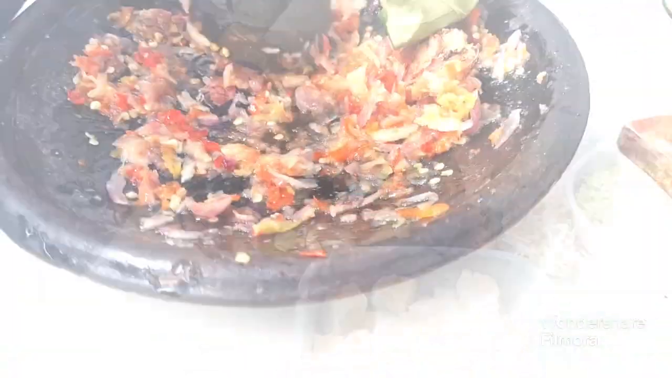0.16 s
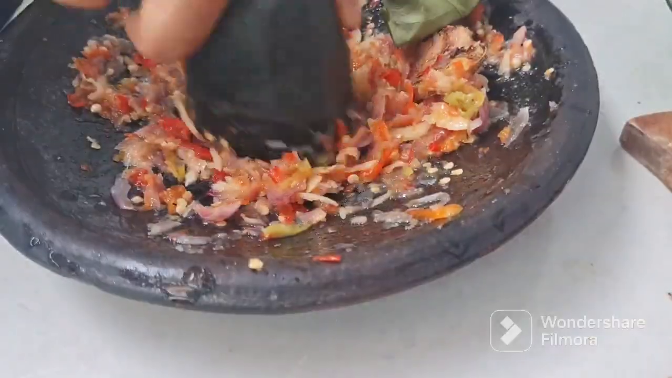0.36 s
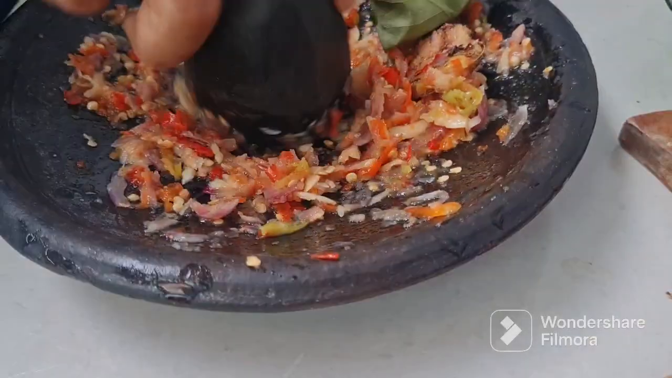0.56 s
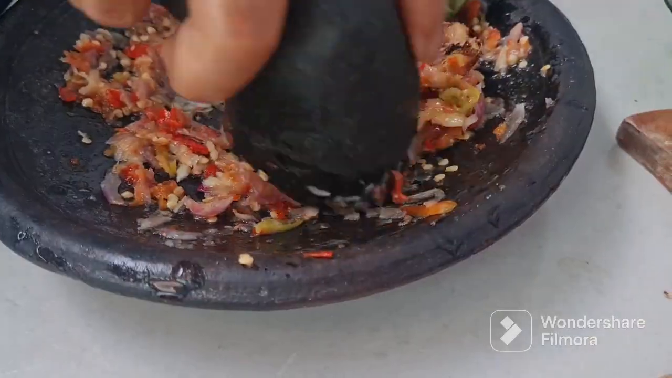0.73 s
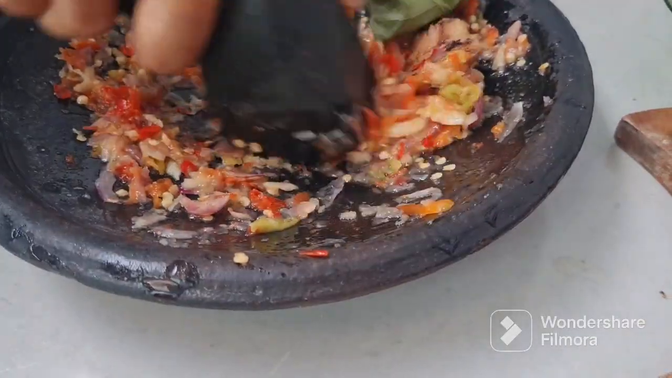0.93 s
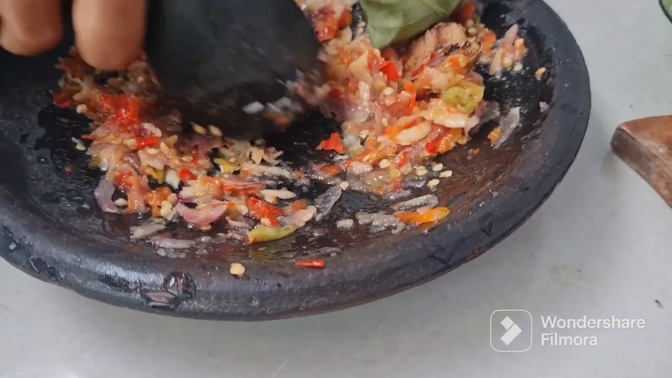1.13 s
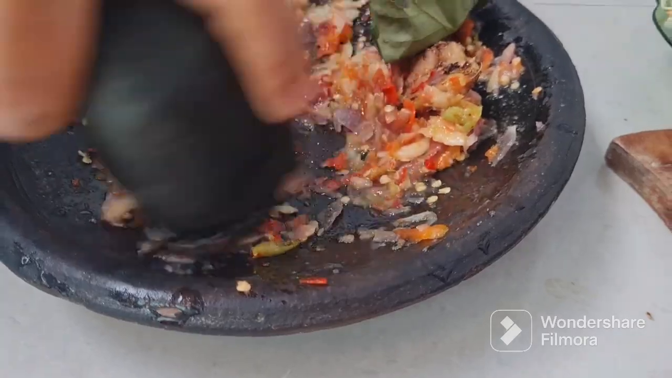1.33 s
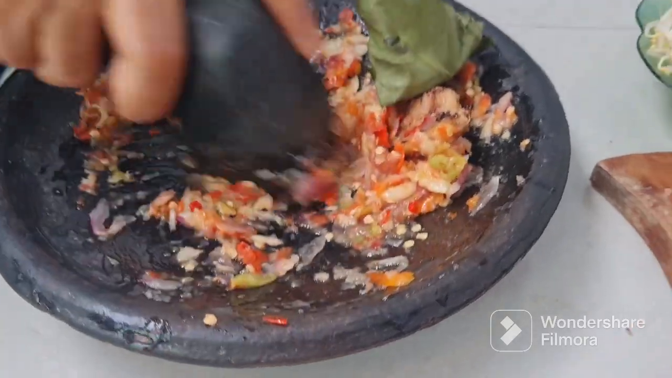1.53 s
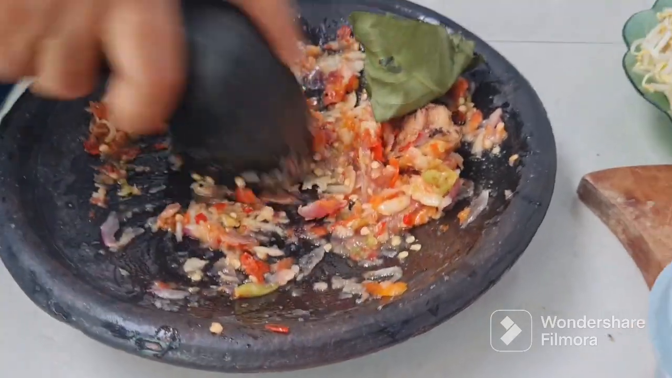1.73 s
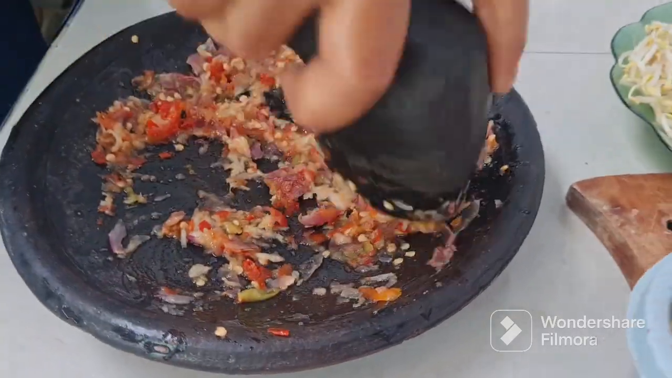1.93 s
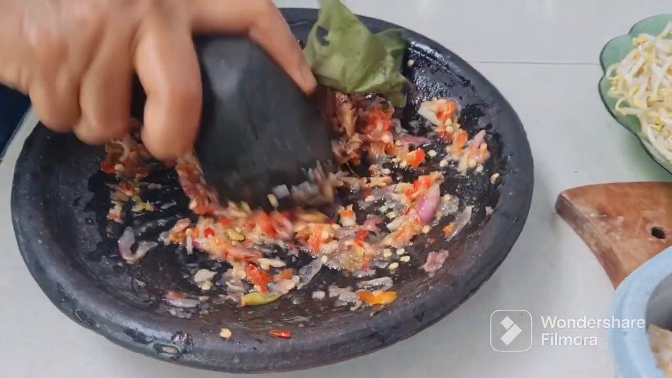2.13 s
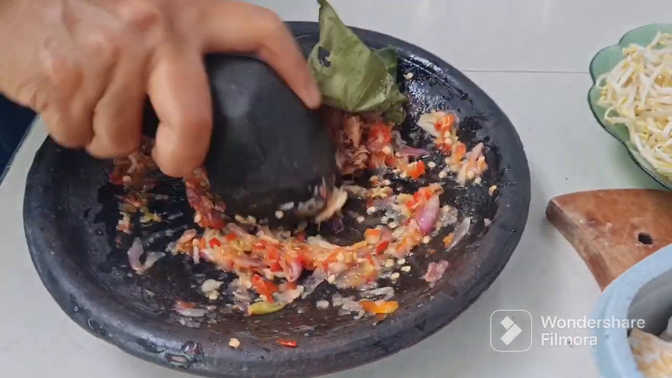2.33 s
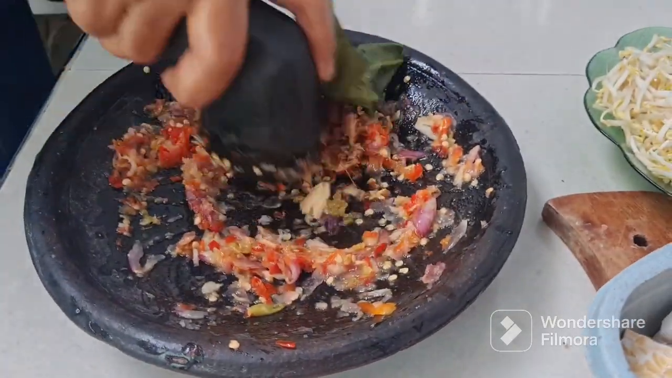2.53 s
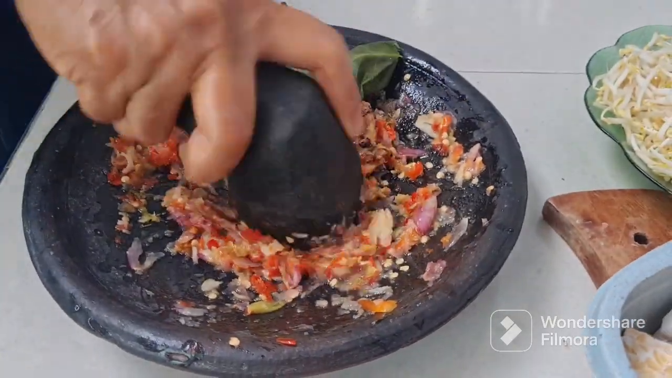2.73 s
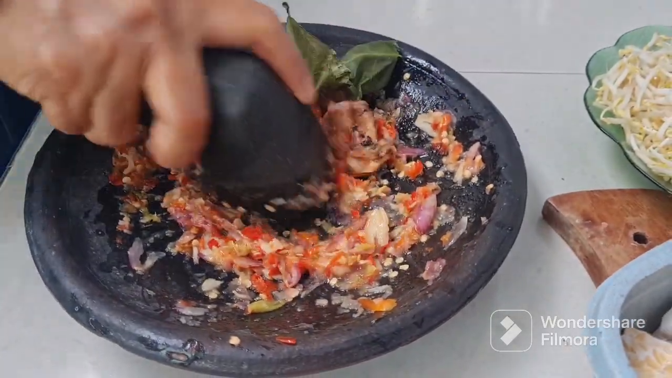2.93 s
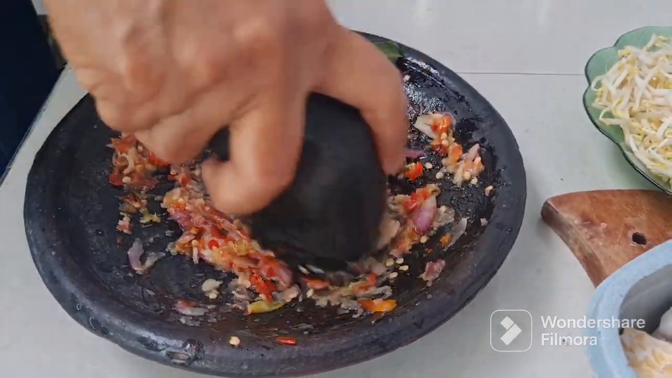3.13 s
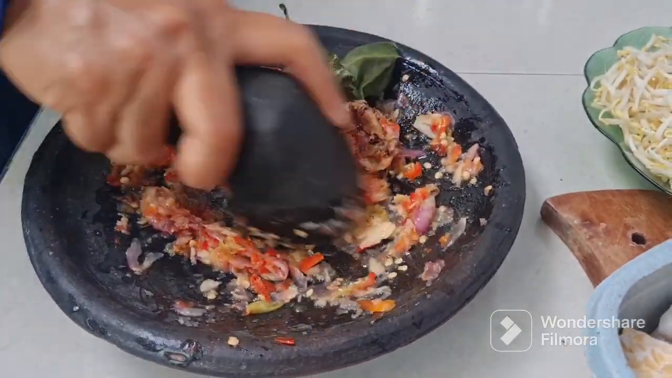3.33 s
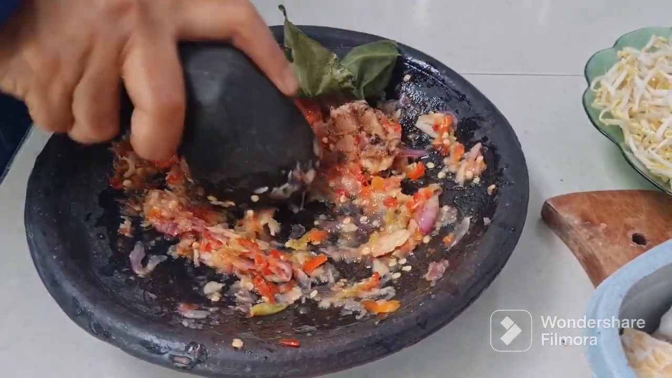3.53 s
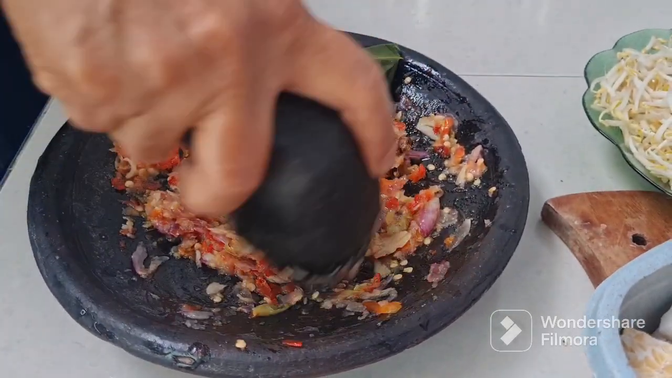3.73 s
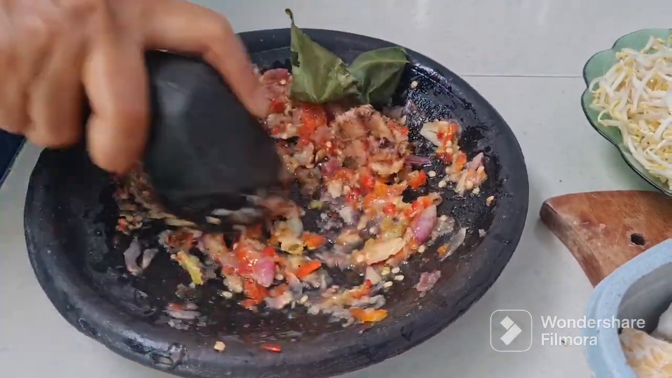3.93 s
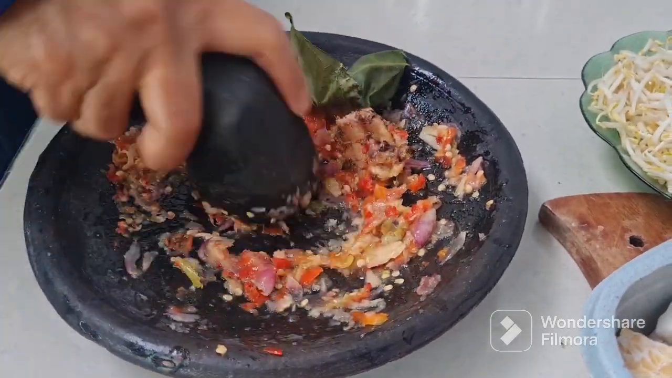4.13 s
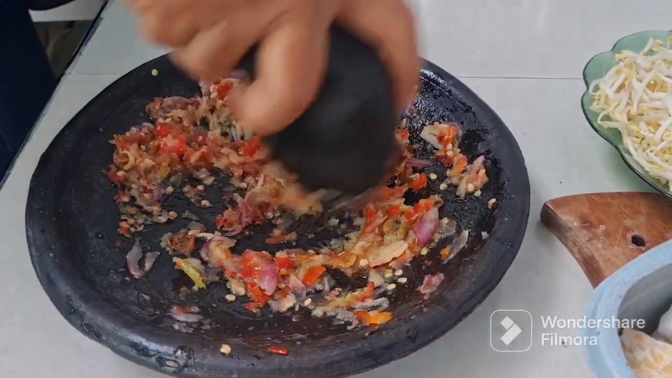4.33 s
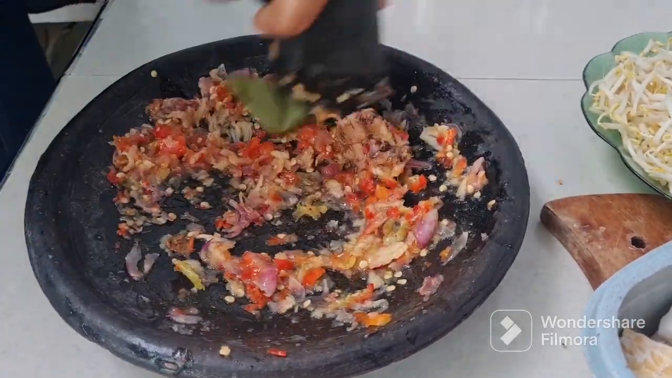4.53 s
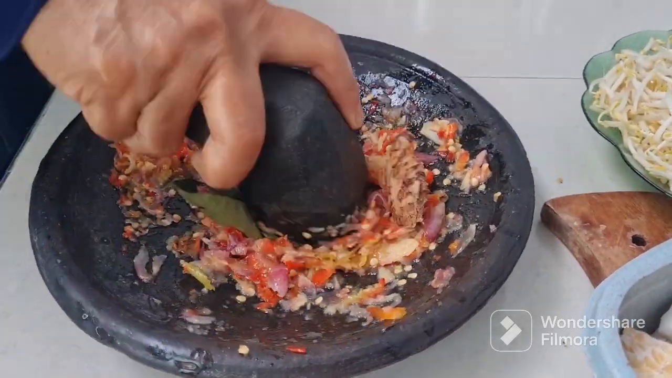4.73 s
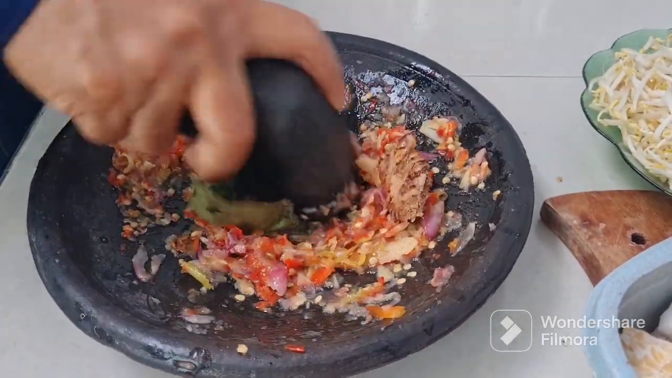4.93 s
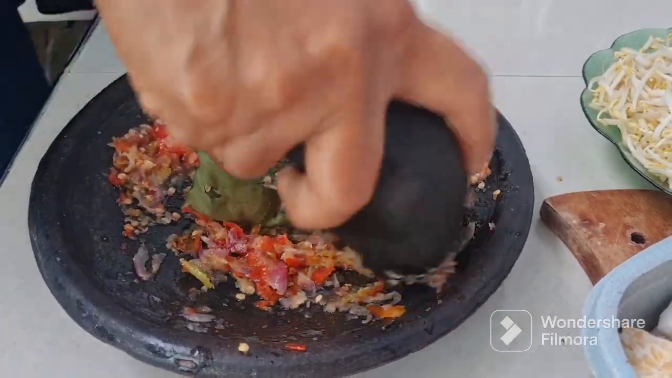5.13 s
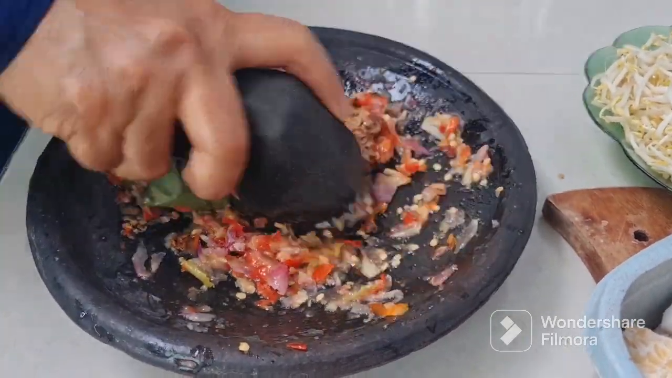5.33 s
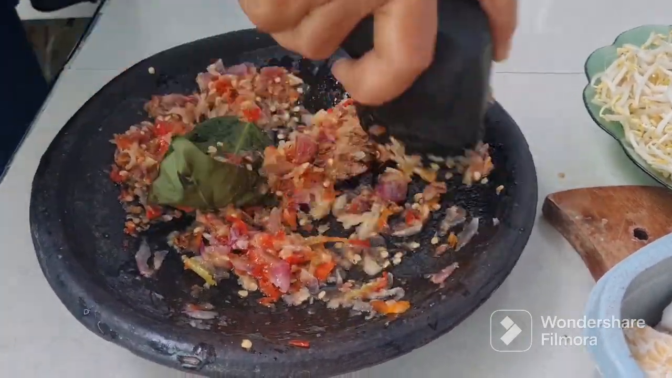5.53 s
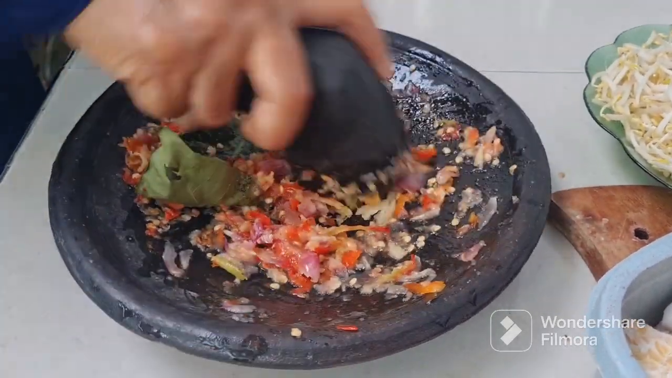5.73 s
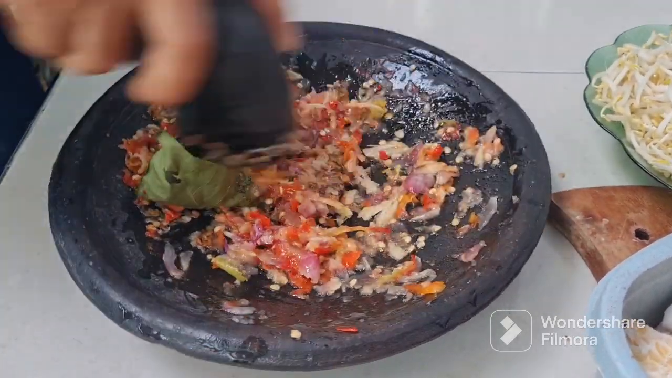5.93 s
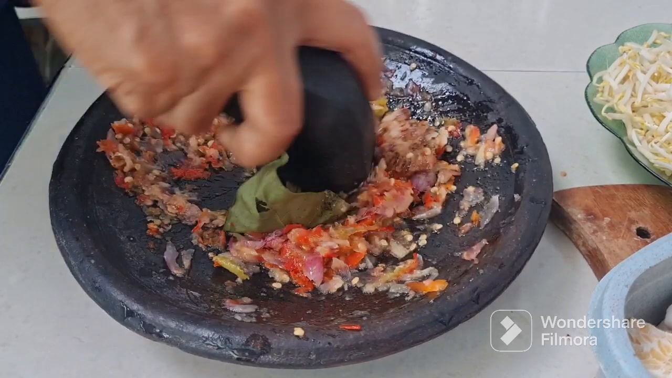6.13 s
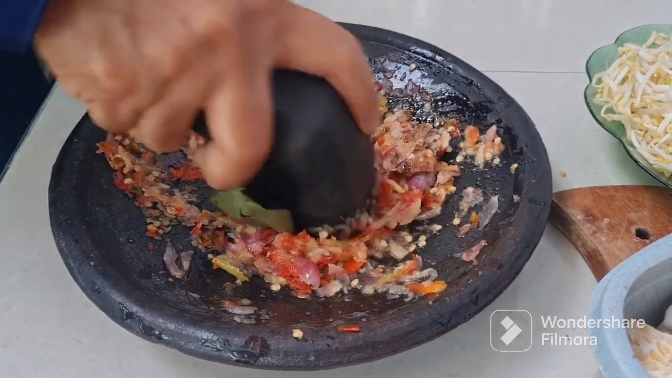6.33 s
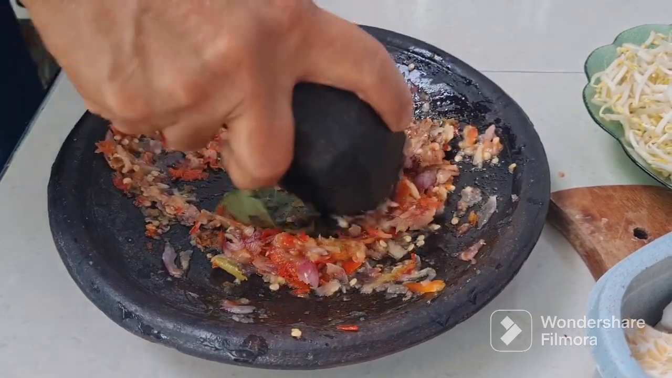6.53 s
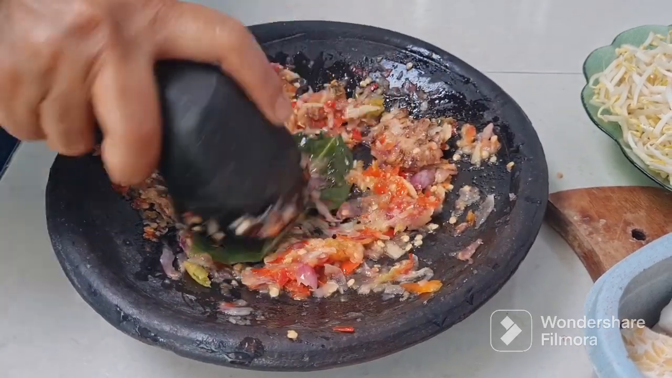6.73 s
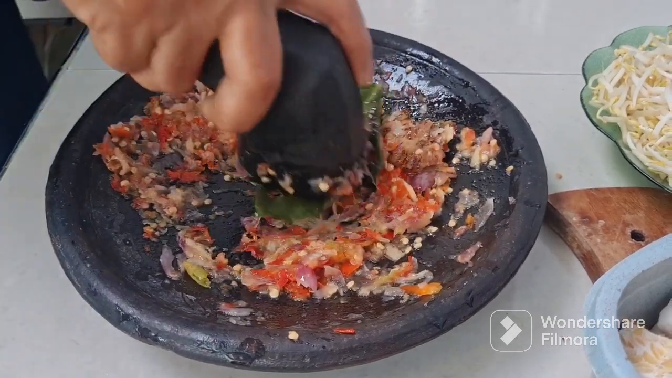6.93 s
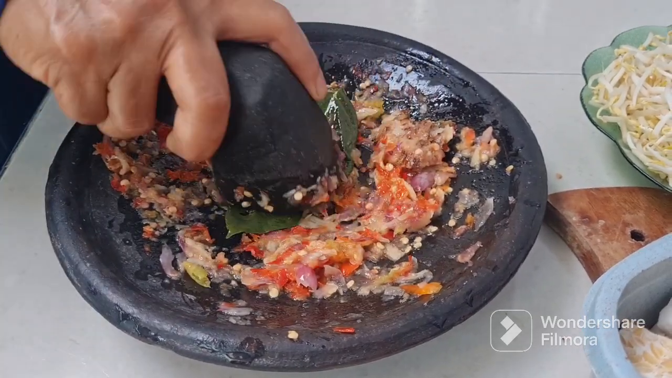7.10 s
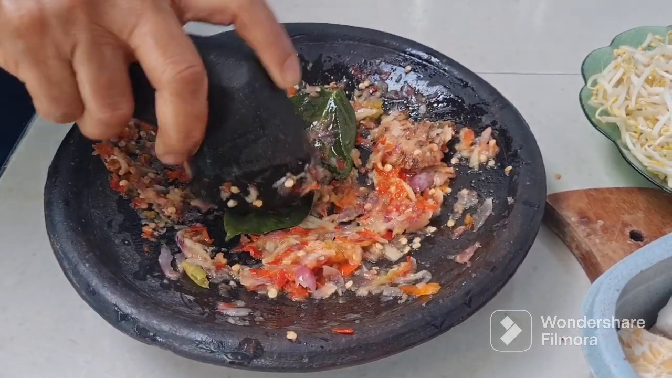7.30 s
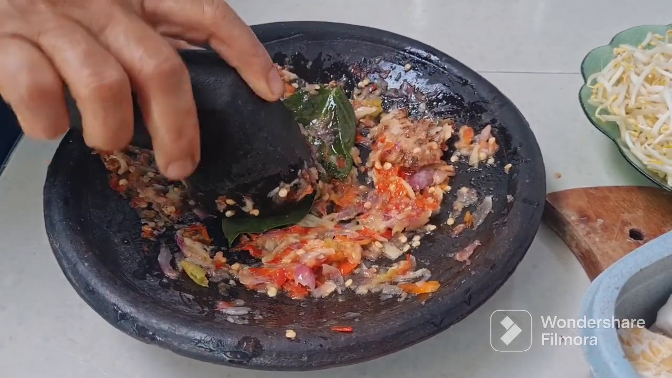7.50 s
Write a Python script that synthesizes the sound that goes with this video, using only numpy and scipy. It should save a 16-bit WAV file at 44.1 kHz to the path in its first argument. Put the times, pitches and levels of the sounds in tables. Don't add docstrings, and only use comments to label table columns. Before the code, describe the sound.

A scrap of scrape and wet crackle, a blink of silence, then a stone pestle works chilli and shallot in a flat stone mortar on a table. Dull low thuds come irregularly, several a second, with short gritty scrapes, moist squelches and crisp seed pops. Bare stone knocks stand out now and then, hardest just after five seconds. Close stereo microphone in a small reverberant kitchen, faint engine hum far outside.

```python
import sys
import numpy as np
from scipy import signal
from scipy.fft import rfft, irfft, next_fast_len
from scipy.io import wavfile

SR = 44100
rng = np.random.default_rng(int(sys.argv[2]) if len(sys.argv) > 2 else 0)


def waveform_to_disk(signal):
    frames = np.transpose(np.atleast_2d(signal))
    scaled = np.clip(frames, -1, 1) * 32767
    samples = np.round(scaled).astype(np.int16)
    wavfile.write(sys.argv[1], SR, samples)


def volts_from_decibels(level):
    exponent = np.asarray(level, float) / 20
    return 10 ** exponent


N = 333396

# f/Hz, level/dB, T60/s
TABLE_MODES = [(119, -5.5, 0.063), (168.7, -1, 0.06), (239, 4, 0.012), (242, 8, 0.051), (291.3, 0.5, 0.074),
               (317.4, -1, 0.1), (392.2, -3.5, 0.1), (423, -6, 0.18), (481, -3, 0.044), (594, -9, 0.051)]
# f/Hz, level/dB, T60/s
RIM_MODES = [(670, 1.5, 0.026), (792, -1, 0.052), (924, -6, 0.023)]
# f/Hz, level/dB, T60/s
STONE_MODES = [(1080, 10, 0.011), (1290, -38, 0.02), (1470, 6.5, 0.016), (1930, -1.5, 0.051),
               (2230, 3, 0.03), (2490, 3.5, 0.023), (2800, 7.5, 0.018), (3170, 6.5, 0.018),
               (3640, -1, 0.025), (4460, 8, 0.0049), (5000, 1, 0.014)]

# t/s, peak level/dB, rim mode level/dB, leading f/Hz
PRESSES = [(0.046, -16, -13, 474), (0.211, -11.5, -6.5, 242), (0.524, -8, -8, 300),
           (0.7883, -7.5, -10, 292), (0.93, -12.5, -11, 254), (1.174, -10, -10, 256), (1.414, -10, -2, 247),
           (1.603, -15.5, -7, 242), (2.077, -6.5, -49, 242), (2.213, -10, -20, 386), (2.392, -8, -26, 162),
           (2.447, -13.5, -4, 262), (2.747, -4, -13, 250), (2.946, -8.5, -4.5, 230),
           (3.343, -12, -5.5, 255), (3.386, -8, -8, 387), (3.6, -5, -7.5, 275), (3.662, -8.5, -5, 235),
           (4.05, -10, -10, 394), (4.246, -5.5, -3, 217), (4.615, -15.5, -2.5, 292),
           (4.719, -14.5, -3.5, 296), (5.207, -2.5, -5, 272), (5.274, 0.5, -12, 250),
           (5.641, -5.5, -6, 467), (5.7143, -7, -9, 232), (6.062, -9, -5, 436), (6.102, -8, -1, 428),
           (6.745, -9.5, -19, 230), (7.385, -14, -27, 198)]
# t/s, peak level/dB
ROCKS = [(0.315, -19), (0.571, -13.5), (1.234, -12), (1.335, -53), (1.549, -24), (1.735, -18), (1.806, -14),
         (2.548, -20), (2.827, -44), (3.003, -8), (3.182, -23.5), (3.857, -10), (3.931, -19), (4.829, -26),
         (4.932, -21), (4.982, -59), (5.336, -42), (5.492, -20.5), (5.868, -19.5), (6.49, -26),
         (6.832, -14), (6.889, -35), (7.075, -27.5), (7.158, -20.5)]
# t/s, peak level/dB, leading f/Hz
SLIPS = [(0.539, -6.5, 290.0), (0.55, -9, 180.0), (0.593, -8.5, 250.0), (0.612, -20, 312),
         (0.818, -16, 410.0), (0.861, -18, 300.0), (0.953, -12.0, 250.0), (0.964, -15, 230.0),
         (1.009, -18, 250.0), (1.183, -13.5, 260.0), (1.199, -9, 260.0), (1.213, -10.0, 270.0),
         (1.377, -25, 240.0), (1.423, -10.5, 250.0), (1.434, -13, 370.0), (1.569, -20.5, 260.0),
         (1.627, -19, 286), (1.755, -17.5, 260.0), (2.096, -26, 290.0), (2.126, -41, 210.0),
         (2.414, -17.0, 250.0), (2.429, -10.5, 233), (2.47, -11.5, 308), (2.731, -12.5, 200.0),
         (2.858, -25, 210.0), (2.971, -13, 190.0), (3.022, -14.5, 250.0), (3.035, -28, 340.0),
         (3.244, -22, 220.0), (3.351, -8.5, 260.0), (3.53, -16.5, 240.0), (3.624, -3.5, 350.0),
         (3.65, -6.5, 284), (4.015, -13.5, 406), (4.266, -6.5, 320.0), (4.297, -10.5, 418),
         (4.626, -15, 272), (4.684, -11.5, 385), (4.705, -17, 290.0), (4.745, -16, 328),
         (4.801, -21, 270.0), (4.985, -22.5, 262), (5.236, -11, 310.0), (5.31, -16, 250.0),
         (5.347, -16, 270.0), (5.376, -15.5, 268), (5.826, -14, 275), (5.947, -19, 250.0),
         (6.124, -5, 410.0), (6.139, -11, 260.0), (6.802, -13.5, 262), (7.177, -37, 300.0)]
ROCK_RIM_DB, ROCK_HZ = -12.5, 250
SLIP_DB, SLIP_RIM_DB = -3, -13
JUDDER_S = 0.01212
TABLE_CUT_HZ = 96

# t/s, peak level/dB, level of modes above 1.8 kHz/dB, bounce delay/ms, leading f/Hz
KNOCKS = [(0.209, -73, -20, 8.1, 2800), (0.2154, -31, -46, 4.1, 2000), (0.361, -51, -28.5, 7, 3250),
          (0.375, -57, -30, 6.1, 3260), (0.394, -52, -51, 6.8, 3200), (0.5268, -39, -23.5, 8.7, 2520),
          (0.7889, -1, -22.5, 14.1, 2800), (1.179, -18.5, -36, 3.3, 2360), (1.2358, -19.5, -47, 4.1, 2400),
          (1.4139, -2.5, -25.5, 5.6, 1950), (1.6033, -18.5, -58, 11, 2300), (1.804, -22, -45, 7.7, 2500),
          (2.2102, -31, -36.5, 5.4, 2200), (2.451, -18.5, -44, 3.5, 2300), (2.7466, -14.5, -28, 10, 2480),
          (2.946, -44, -22.5, 4.4, 2480), (3.015, -21, -30.5, 4.2, 3000), (3.3403, -33, -32, 5.6, 2600),
          (3.3882, -14.5, -32, 7.1, 2300), (3.5938, -45, -24.5, 4.3, 2230), (3.6668, -13, -26, 8.1, 2320),
          (4.051, -27, -32, 8.3, 2400), (4.239, -34, -24.5, 12, 2620), (4.247, -32, -28.5, 4.6, 2800),
          (4.6137, -18, -11.5, 10, 2300), (4.7231, -33, -24.5, 9.3, 2300), (5.2083, -3.5, -18.5, 7.4, 3050),
          (5.2195, -8, -36, 2.8, 1980), (5.2754, -15, -21, 11.6, 2050), (5.644, -23, -19, 2.35, 2800),
          (5.7152, -7, -13, 4.5, 3080), (6.0636, -35, -23, 4, 2370), (6.1043, -34, -15, 1.7, 2500)]
LEAD_DB_PER_OCTAVE = 15
BOUNCE_DB, BOUNCE_LOW_DB = 5, -5
HARD_DB, BOUNCE_LOSS = 16, 0.2
CHATTER_MS, CHATTER_DB = 2.2, -2.5
CONTACT_HZ = 6170
HAND_DAMPING = 0.75
FAR_DAMPING, FAR_DB = 0.34, 10

# t/s, length/s, stone scrape level/dB, pulp crackle level/dB
STROKES = [(0.0, 0.011, -30, -37.5), (0.277, 0.11, -37, -43.5), (0.48, 0.1, -32, -43),
           (0.829, 0.087, -23, -51), (0.933, 0.14, -34, -56), (1.15, 0.12, -36, -51),
           (1.075, 0.021, -45, -48.5), (1.528, 0.052, -31.5, -45), (1.627, 0.2, -41.5, -53.5),
           (2.077, 0.2, -39, -44.5), (2.2, 0.21, -49, -47), (2.387, 0.086, -38, -43),
           (2.63, 0.055, -41, -49), (2.695, 0.32, -34, -42.5), (2.918, 0.21, -58, -54.5),
           (3.185, 0.095, -40, -49), (3.344, 0.056, -31, -41.5), (3.511, 0.17, -37, -39.5),
           (3.861, 0.21, -33, -43.5), (4.143, 0.0091, -31.5, -39.5), (4.23, 0.08, -31, -44.5),
           (4.32, 0.079, -50, -66), (4.606, 0.14, -25, -50), (4.775, 0.19, -33, -51.5),
           (5.242, 0.16, -63, -46.5), (5.322, 0.14, -34.5, -50), (5.66, 0.085, -48, -52),
           (5.666, 0.18, -25, -59), (6.054, 0.15, -30, -53), (6.353, 0.056, -35.5, -51),
           (6.45, 0.086, -46, -49.5), (6.699, 0.17, -32, -44), (7.075, 0.12, -41.5, -53),
           (7.37, 0.17, -39.5, -63)]
BITE_DB_PER_S, LIFT_DB_PER_S, IDLE_DB = 464, 171, -68.5
RUMBLE_DB, RUMBLE_SWELL_S, RUMBLE_REST_DB = -30, 0.033, -49

# t/s, peak level/dB, f/Hz, length/ms
CRACKS = [(0.3164, -17.5, 7900, 4.4), (0.3586, -8.5, 4020, 2.5), (0.509, -11, 5200, 1.67),
          (0.9762, -13, 5600, 2.25), (1.1618, -15.5, 5600, 4.2), (1.222, -14.5, 10000, 3),
          (1.7811, -11, 5900, 1.56), (2.2185, -22, 10500, 1.2), (2.2325, -3.5, 9900, 1.1),
          (2.38, -18, 11200, 0.81), (2.39, -8.5, 7900, 1.43), (2.4698, -10.5, 5000, 2.2),
          (2.7564, -6.5, 5540, 1.46), (2.9239, 0.5, 6430, 1.88), (2.99, -4.5, 5400, 2.65),
          (3.3116, -22.5, 11300, 5.1), (3.3764, -12.5, 4960, 3.2), (3.5569, -13, 9900, 1.6),
          (3.5815, -2.5, 5450, 2.46), (3.727, -22, 10900, 1.9), (3.9465, -13.5, 7390, 2.05),
          (3.9926, -0.5, 5660, 0.8), (4.0717, -5.5, 4620, 1.1), (4.177, -21, 7500, 3.3),
          (4.964, -15.5, 5450, 3.84), (5.3534, -12.5, 5150, 2.2), (5.4166, -15.5, 4770, 3.1),
          (4.6075, -19, 3000, 2), (5.6375, -18.5, 13000, 2.6), (5.689, -31, 12200, 2),
          (5.703, -36, 12000, 1.7), (6.0524, -11, 4200, 2.85), (6.8256, -1, 10100, 1.17),
          (7.0699, -4, 4860, 5.1), (7.3834, -13.5, 5000, 2.33)]
# t/s, peak level/dB
SNAPS = [(0.0588, -22), (0.177, -26), (0.622, -14.5), (0.9625, -20), (1.2473, -15), (1.6573, -18),
         (1.7155, -24), (2.07, -22), (2.5716, -23), (2.6574, -17.5), (3.2753, -17), (3.4203, -11.5),
         (3.5224, -18), (3.86, -20), (3.929, -21), (4.136, -32), (4.2204, -19), (4.3014, -16.5),
         (4.5705, -36), (4.5968, -22), (4.83, -26), (6.039, -33), (6.4932, -27), (6.51, -21), (6.7067, -20),
         (6.814, -14), (6.889, -19)]
# t/s, peak level/dB, f/Hz
TICKS = [(0.5154, -8, 5910), (0.8589, -26, 4820), (0.8714, -33, 6230), (0.946, -21, 5300),
         (0.9954, -16, 5500), (1.0104, -24, 6510), (1.074, -32, 5530), (1.1348, -28, 5700),
         (1.1702, -14, 5400), (1.254, -18, 5360), (1.2734, -18, 5750), (1.545, -25, 4690),
         (1.6352, -20, 5630), (1.7454, -19, 5320), (1.793, -14, 5450), (1.8114, -17, 5560),
         (1.8294, -35, 5300), (2.0517, -38, 5020), (2.2035, -26, 9810), (2.2444, -1.5, 5340),
         (2.4457, -13, 5590), (2.6284, -22, 4440), (2.647, -22, 5400), (2.6838, -43, 6400),
         (3.0365, -15, 5400), (3.1727, -27, 7310), (3.218, -20, 10700), (3.3554, -29, 5020),
         (3.5722, -14, 9810), (3.5895, -6, 5070), (3.9547, -13, 7370), (4.0104, -23, 5670),
         (4.152, -25, 5270), (4.2342, -26, 4690), (4.266, -30, 6490), (4.2832, -19, 4820),
         (4.5805, -18, 4500), (5.361, -12, 5170), (6.1723, -20, 5100), (6.3709, -21, 7340),
         (6.4024, -21.5, 10900), (6.4323, -38, 5230), (6.4557, -39, 5570), (6.6874, -28, 5370),
         (6.7226, -13, 5110), (6.7436, -21, 11900), (6.801, -37, 5150), (7.0804, -20, 5440)]
SNAP_HZ, SNAP_MS = 5200, 2.0
TICK_MS, TICK_DB = 0.53, -1
SPIT_DB = -10
SPLIT = 11

# f/Hz, level per Hz/dB
PULP = [(900, -35), (1700, -13), (2300, 2), (3900, -0.5), (5700, 0.5), (7600, -8.5), (11500, -1.5),
        (16000, -12.5)]
HISS_FLICKER_DB, CLUMP_DB, PRICK_SHARE = 3.5, 3, 0.8
BOWL_SHARE = 0.22
ECHO_SET_S = 0.015

# f/Hz, T60/s
KITCHEN_T60 = [(150, 1), (500, 0.16), (1500, 0.59), (4000, 0.4), (10000, 0.35)]
# f/Hz, level/dB
WET = [(150, -9), (500, -3.5), (1500, 2.5), (4000, 1), (10000, 4)]
ROOM_BUILD_S, ROOM_PATTERN_S = 0.012, 0.11
KNOCK_WET_DB, PULP_WET_DB = -7, -11
WALL_ECHO_S, WALL_ECHO_DB = 0.022, -15

# t/s, firing order level/dB
ENGINE = [(0.0, -39.5), (0.63, -30), (0.76, -55), (2.15, -30), (2.36, -30), (2.92, -29.5), (3.2, -33),
          (3.58, -30.5), (4.9, -39), (5.39, -46), (5.62, -47), (7.31, -53), (7.56, -33)]
ENGINE_HZ, FLUTTER_DB = 42.95, 5
ENGINE_MEAN_DB, FOURTH_DB, FOURTH_SWING = -34, -42.5, 2.8
# start t/s, end t/s, start f/Hz, end f/Hz, width/Hz, level/dB
YARD = [(5.08, 5.2, 3830, 4000, 64, -55), (5.121, 5.194, 3180, 2820, 65, -48),
        (6.618, 7.208, 1537, 1534, 318, -51), (7.366, 7.559, 1450, 1430, 198, -51.5),
        (6.616, 7.117, 758, 750, 39.76, -50), (6.755, 7.15, 1004, 940, 60.6, -53.5),
        (7.198, 7.56, 970, 1046, 50.3, -58), (6.304, 6.613, 709, 713, 39.9, -52),
        (7.15, 7.559, 725, 746, 201.3, -57), (7.41, 7.56, 627, 630, 33.9, -46.5),
        (7.448, 7.552, 3080, 2800, 170, -39)]
# f/Hz, level per Hz/dB
AIR = [(18, -43), (42, 15), (103, 1), (245, 2.5), (345, -42), (423, -29), (544, -14), (766, -5.5),
       (1260, -54), (2880, -9.5), (5090, -15.5), (7000, -56), (9100, -61), (15400, -120)]
AIR_DB = -33

# f/Hz, level/dB
PORTS = [(60, -3), (400, -3), (800, -2), (1500, -.5), (2800, -3.5), (5500, -5), (10000, -3.5), (15000, -4)]
PORT_LAG = 6
GAP_S = (0.013, 0.0455)
CUTOFF_HZ = 16350


def pushes():
    rocks = [(s, db, ROCK_RIM_DB, ROCK_HZ) for s, db in ROCKS]
    slips = [(s, db + SLIP_DB, SLIP_RIM_DB, hz) for s, db, hz in SLIPS]
    return np.transpose(PRESSES + rocks + slips)


def thuds(count=3):
    s, peak_db, rim_db, lead_hz = pushes()
    late = rng.random((len(s), count)) * (np.arange(count) > 0)
    times = (s[:, None] + late * JUDDER_S).ravel()
    push_db = (peak_db[:, None] - 8.0 - 3 * (late > 0) - 8 * late).ravel()
    octaves = np.log2(np.array(TABLE_MODES)[:, 0] / np.repeat(lead_hz, count)[:, None])
    table_db = push_db[:, None] - 8.5 * np.abs(octaves)
    low = strike(TABLE_MODES, times, table_db, spread_db=np.e)
    rim_push_db = push_db + np.repeat(rim_db, count) + 2.5
    rim_level_db = np.outer(rim_push_db, np.ones(len(RIM_MODES)))
    return low + strike(RIM_MODES, times, rim_level_db, spread_db=np.e)


def knocks(count=4):
    s, peak_db, high_db, bounce_ms, lead_hz = np.transpose(KNOCKS)
    mode_hz = np.array(STONE_MODES)[:, 0]
    high = mode_hz > 1800
    off_db = LEAD_DB_PER_OCTAVE * np.abs(np.log2(mode_hz / lead_hz[:, None]))
    first_db = np.where(high, high_db[:, None] - off_db - 4.5, peak_db[:, None] - 13.5)

    back_db = BOUNCE_DB + BOUNCE_LOSS * (high_db[:, None] - HARD_DB) + BOUNCE_LOW_DB * ~high
    times = np.concatenate([s, s + bounce_ms / 1000])
    level_db = np.concatenate([first_db, first_db + back_db])

    late = (np.arange(count) + rng.random((len(times), count))) / count * CHATTER_MS / 1000
    chatter_db = np.where(high, level_db, -120)[:, None] + CHATTER_DB * np.arange(count)[:, None]
    all_times = np.append(times, times[:, None] + late)
    all_db = np.concatenate([level_db, chatter_db.reshape(-1, len(STONE_MODES))])

    held = [(hz, db + 2.5, t60 * HAND_DAMPING) for hz, db, t60 in STONE_MODES]
    near = strike(held, all_times, all_db, spread_db=2, swing=1)
    blurred = [(hz, db + FAR_DB, t60 * FAR_DAMPING) for hz, db, t60 in STONE_MODES]
    far = strike(blurred, s, first_db, spread_db=2.5, swing=1)
    dull = signal.butter(2, CONTACT_HZ, fs=SR, output="sos")
    return signal.sosfilt(dull, [near, far])


def stroking():
    t = np.arange(0, N + 64, 64) / SR
    start, length, *levels = np.transpose(STROKES)[:, :, None]
    before_db = BITE_DB_PER_S * np.maximum(start - t, 0)
    after_db = LIFT_DB_PER_S * np.maximum(t - start - length, 0)
    curves = [np.maximum((db - before_db - after_db).max(axis=0), IDLE_DB) for db in levels]
    return [np.interp(np.arange(N) / SR, t, curve) for curve in curves]


def shaking():
    s, peak_db = pushes()[:2]
    kicks, r = np.zeros(N), np.exp(-1 / (RUMBLE_SWELL_S * SR))
    kicks[(s * SR).astype(int)] = volts_from_decibels(peak_db + RUMBLE_DB)
    swell = signal.lfilter([1], [1, -2 * r, r * r], kicks)
    return volts_from_decibels(RUMBLE_REST_DB) + np.e * (1 - r) * swell


def grinding():
    base = rubbed(TABLE_MODES, 200, 2.5, damping=0.8)
    base = base + volts_from_decibels(-14) * rubbed(RIM_MODES, 200, 2.5, damping=0.8)
    grit = rubbed(STONE_MODES, 900, 4.0, damping=0.4)
    rumble = shaking() * volts_from_decibels(2 * drift(30)) * base
    scrape_db = stroking()[0] - 12.5 + 2 * drift(42)
    return rumble + volts_from_decibels(scrape_db) * grit


def cracks():
    length = 2000
    out, span = np.zeros(N + length), np.arange(length) / SR
    small = SNAPS + [(s, high_db + SPIT_DB) for s, _, high_db, *_ in KNOCKS]
    bursts = CRACKS + [(s, db, SNAP_HZ, SNAP_MS) for s, db in small]
    bursts = bursts + [(s, db + TICK_DB, hz, TICK_MS) for s, db, hz in TICKS]
    fibre = signal.butter(1, [2400, 9000], "band", fs=SR, output="sos")
    tears = rng.standard_normal((len(bursts), length))
    for (s, peak_db, hz, length_ms), tear in zip(bursts, tears):
        u = span / (max(length_ms, 0.3) / 1000)
        at_split = np.arange(length) == np.argmin(np.abs(u - 1.5))
        split = SPLIT / max(length_ms, 1) * at_split
        tear = signal.sosfilt(fibre, tear * np.abs(tear) + 2 * split)
        pitched = signal.lfilter(*signal.iirpeak(hz, 1.8, fs=SR), tear)
        envelope = np.exp(-2 * (u - 1.5) ** 2) + 0.48 * np.exp(-u / 5) * (u > 1.5)
        burst = (rms_one(pitched) + 1.5 * rms_one(tear)) * envelope
        at = round((s - 0.001 * length_ms) * SR)
        out[at:at + length] += volts_from_decibels(peak_db) * burst / np.abs(burst).max()
    return out[:N]


def squelch(count=14):
    pops = grains(700 * volts_from_decibels(4.0 * drift(70)), uneven_db=3.0)
    dealt = rng.integers(0, count, N)
    rings = np.zeros(N)
    for k, hz in enumerate(np.geomspace(2200, 14500, count)):
        rings += ring(pops * (dealt == k), hz, 1.5 / hz) * np.sqrt(hz)
    hiss = rng.standard_normal(N) * volts_from_decibels(HISS_FLICKER_DB * drift(220))
    pricks = grains(350 * volts_from_decibels(5.0 * drift(40)), uneven_db=3.5)
    pricks = signal.sosfilt(signal.butter(1, 8000, fs=SR, output="sos"), pricks)
    wet = 0.6 * rms_one(rings) + PRICK_SHARE * rms_one(pricks) + hiss
    crackle_db = stroking()[1] + 7.5 + CLUMP_DB * drift(30)
    return volts_from_decibels(crackle_db) * coloured(wet, PULP)


def off_the_dish(x, count=7):
    t = np.arange(160) / SR
    bounce = BOWL_SHARE * rng.standard_normal((count, 2, len(t))) * volts_from_decibels(-60 * t / 0.008)
    bounce[:, :, 0] = 1
    bounce = bounce / np.linalg.norm(bounce, axis=2, keepdims=True)
    slot = (np.arange(N) / SR / ECHO_SET_S).astype(int) % 400
    place = rng.integers(0, count, 400)[slot]
    out = np.zeros((2, N))
    for k in range(count):
        out += signal.oaconvolve((x * (place == k))[None], bounce[k], axes=1)[:, :N]
    return out


def kitchen(x, count=3):
    t, tail = np.arange(int(0.8 * SR)) / SR, 0
    for hz in 125 * 2.0 ** np.arange(7):
        band = signal.butter(2, [hz / 2 ** 0.5, hz * 2 ** 0.5], "band", fs=SR, output="sos")
        fall = volts_from_decibels(-60 * t / at_hz(KITCHEN_T60, hz)) * np.clip(t / ROOM_BUILD_S, 0, 1)
        white = rng.standard_normal((count, 3, len(t))) * fall / np.sqrt(np.sum(fall ** 2))
        alike = np.clip(300 / hz, 0, 0.97)
        pair = alike * white[:, :1] + np.sqrt(1 - alike ** 2) * white[:, 1:]
        tail = tail + volts_from_decibels(at_hz(WET, hz)) * signal.sosfilt(band, pair)
    turn, size = np.arange(N) / SR / ROOM_PATTERN_S, next_fast_len(N + len(t))
    shares = np.sqrt([np.clip(1 - np.abs((turn - k) % count - 1), 0, 1) for k in range(count)])
    spectra = rfft(x * shares, size)[:, None] * rfft(tail, size)
    return irfft(spectra.sum(axis=0), size)[:, :N]


def engine():
    first_db, = in_time(ENGINE)
    fourth_db = FOURTH_DB + FOURTH_SWING * (first_db - ENGINE_MEAN_DB)
    phase = 2 * np.pi * np.cumsum(ENGINE_HZ * (1 + 0.0076 * drift(13))) / SR
    wave = np.sin(phase) + volts_from_decibels(-5.5) * np.sin(2 * phase)
    first = volts_from_decibels(first_db - 10.0 + FLUTTER_DB * drift(10)) * wave
    return first + volts_from_decibels(fourth_db + 3.0 * drift(14)) * np.sin(4 * phase)


def yard():
    out, t = np.zeros(N), np.arange(N) / SR
    for start, end, from_hz, to_hz, width_hz, level_db in YARD:
        phase = 2 * np.pi * np.cumsum(np.interp(t, [start, end], [from_hz, to_hz])) / SR
        fade = np.clip(np.minimum(t - start, end + 0.0076 - t) / 0.023, 0, 1)
        noise = drift(width_hz) * np.sin(phase) + drift(width_hz) * np.cos(phase)
        out += volts_from_decibels(level_db) * fade * noise
    return out


def room_tone():
    shared, own = rng.standard_normal(N), rng.standard_normal((2, N))
    return volts_from_decibels(AIR_DB - 16.0) * coloured(1.8 * shared + own, AIR)


def strike(modes, times, level_db, spread_db, swing=-1):
    at = np.clip(np.round(np.asarray(times) * SR).astype(int), 0, N - 1)
    out = np.zeros(N)
    chance = rng.standard_normal((len(at), len(modes)))
    for k, (hz, mode_db, t60) in enumerate(modes):
        clicks = np.zeros(N)
        np.add.at(clicks, at, volts_from_decibels(level_db[:, k] + mode_db + spread_db * chance[:, k]))
        out -= ring(clicks, hz, t60) * swing ** k
    return out


def rubbed(modes, per_s, uneven_db, damping):
    rings = [volts_from_decibels(db) * ring(grains(per_s, uneven_db), hz, t60 * damping) for hz, db, t60 in modes]
    return rms_one(sum(rings))


def ring(clicks, hz, t60):
    r, w = volts_from_decibels(-60 / (t60 * SR)), 2 * np.pi * hz / SR
    return signal.lfilter([0, np.sin(w)], [1, -2 * r * np.cos(w), r * r], clicks + 1e-18)


def grains(per_s, uneven_db):
    sizes = volts_from_decibels(uneven_db * np.minimum(rng.exponential(1, N), 5)) * rng.choice([-1, 1], N)
    return sizes * (rng.random(N) < per_s / SR)


def drift(rate):
    slow = rng.standard_normal(int(N / SR * rate) + 2)
    return np.interp(np.linspace(0, len(slow) - 1, N), np.arange(len(slow)), slow)


def coloured(x, spectrum):
    hz = np.maximum(np.fft.rfftfreq(N, 1 / SR), 1)
    return rms_one(irfft(rfft(x) * volts_from_decibels(at_hz(spectrum, hz)), N))


def rms_one(x):
    return x / np.sqrt(np.mean(x ** 2) + 1e-20)


def in_time(rows):
    s, *columns = np.transpose(rows)
    return [np.interp(np.arange(N) / SR, s, c) for c in columns]


def at_hz(points, hz):
    table_hz, value = np.array(points).T
    return np.interp(np.log(hz), np.log(table_hz), value)


def scene():
    thud = thuds() + grinding()
    knock, far_knock = knocks()
    pulp = cracks() + squelch()
    stone = thud + knock
    stone = stone + volts_from_decibels(WALL_ECHO_DB) * np.roll(stone, round(WALL_ECHO_S * SR))
    low_cut = signal.butter(2, TABLE_CUT_HZ, "high", fs=SR, output="sos")
    near = signal.sosfilt(low_cut, stone) + engine() + yard() + off_the_dish(pulp)
    near[1] = np.roll(near[1], PORT_LAG)
    room_feed = thud + volts_from_decibels(KNOCK_WET_DB) * far_knock + volts_from_decibels(PULP_WET_DB) * pulp
    both = near + kitchen(room_feed) + room_tone()
    size = next_fast_len(N + SR)
    tilt_db = at_hz(PORTS, np.maximum(np.fft.rfftfreq(size, 1 / SR), 1)) / 2
    tilt = volts_from_decibels(tilt_db * np.array([[1], [-1]]))
    return irfft(rfft(both, size) * tilt, size)[:, :N]


def low_pass(x):
    return signal.sosfilt(signal.butter(12, 16480, fs=SR, output="sos"), x)


def record(dry):
    t = np.arange(N) / SR
    dry = dry * np.where((t > GAP_S[0]) & (t < GAP_S[1]), 0, 1)
    dry = signal.sosfilt(signal.butter(4, 38, "high", fs=SR, output="sos"), dry)
    edge = signal.cheby2(20, 70, CUTOFF_HZ, fs=SR, output="sos")
    x = signal.sosfilt(edge, 1.372 * np.tanh(dry / 1.218))
    return low_pass(np.clip(x, -1, 1))


dry = scene()
out = record(dry)
waveform_to_disk(out)
```